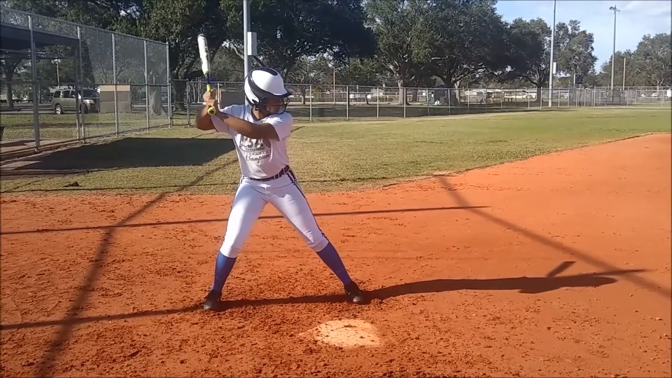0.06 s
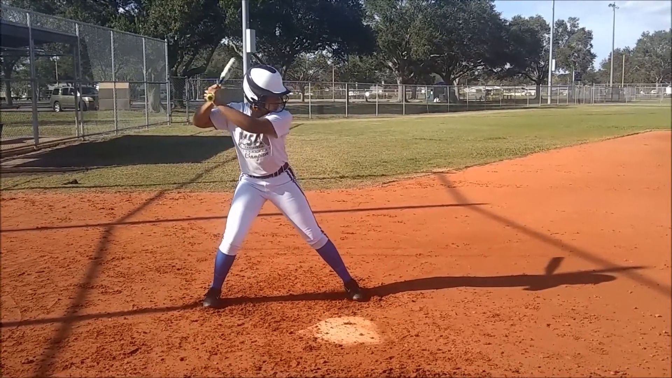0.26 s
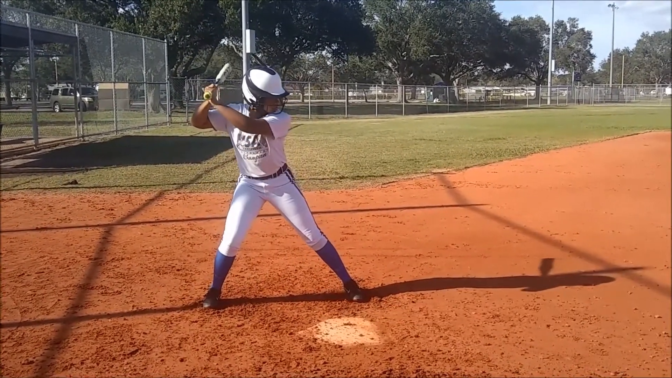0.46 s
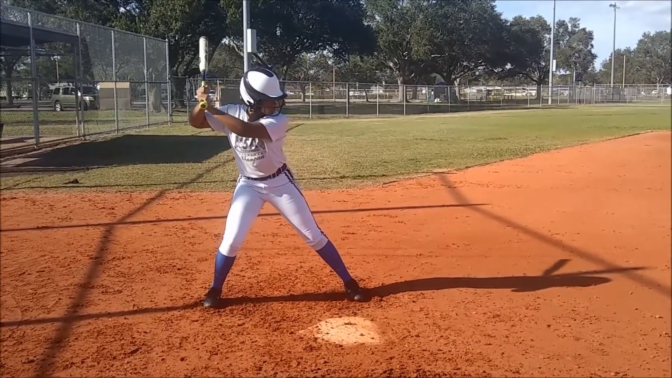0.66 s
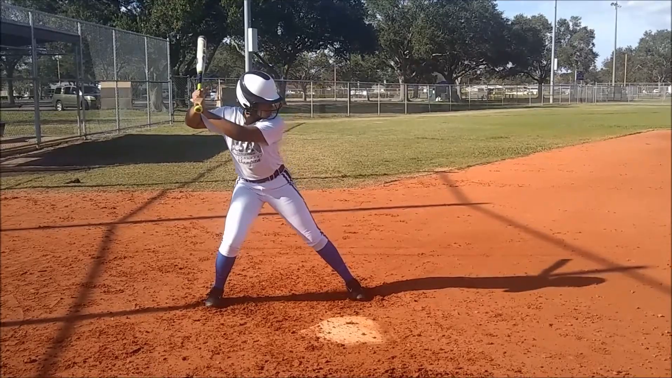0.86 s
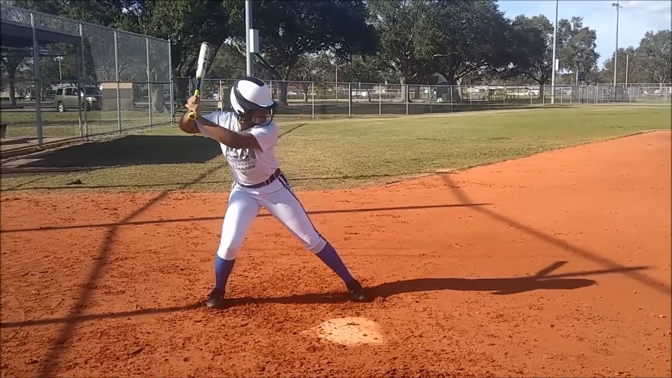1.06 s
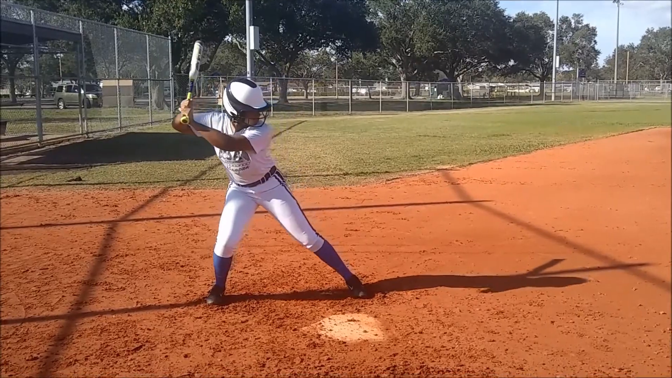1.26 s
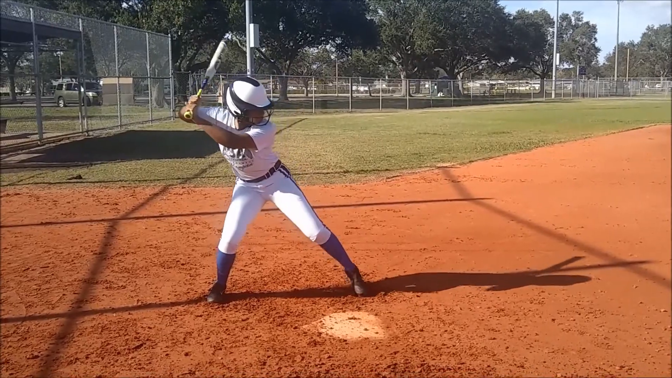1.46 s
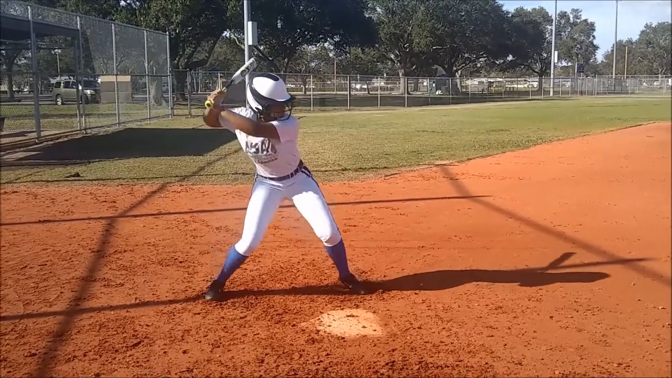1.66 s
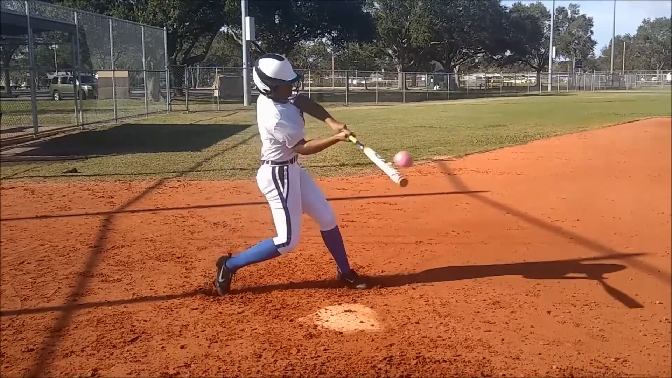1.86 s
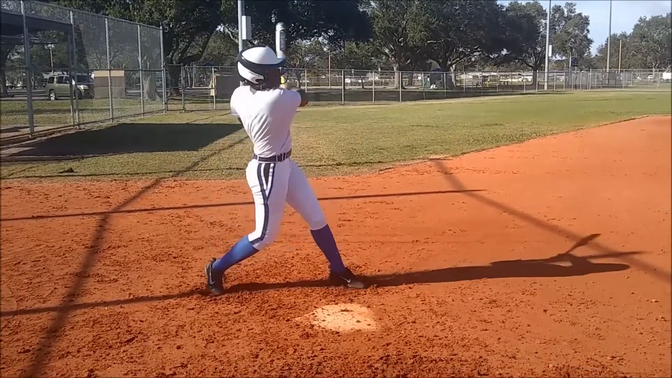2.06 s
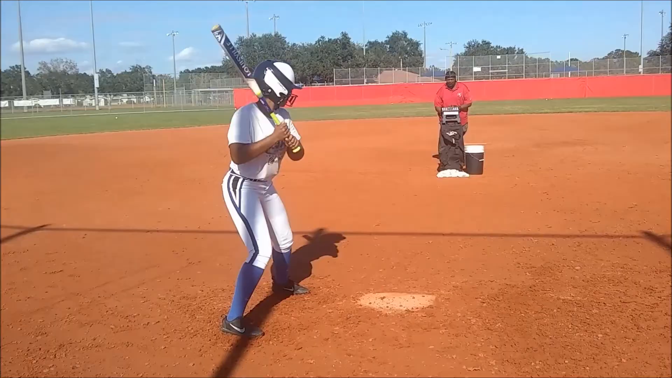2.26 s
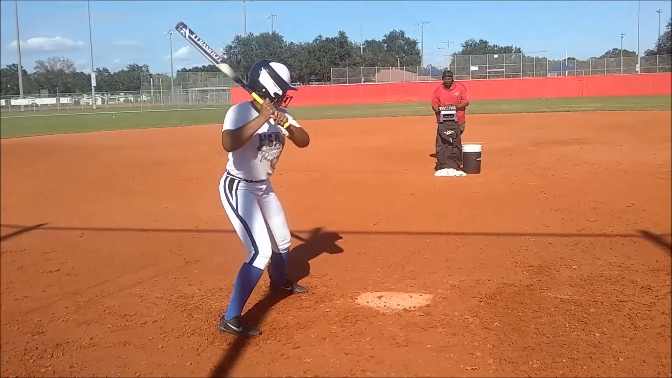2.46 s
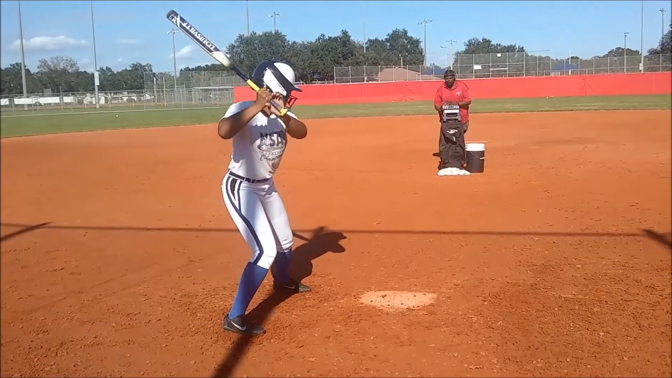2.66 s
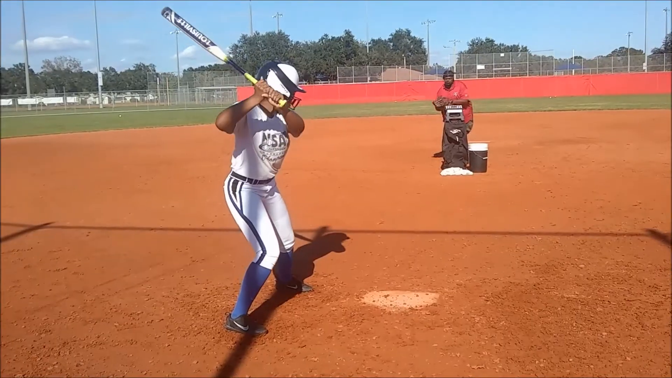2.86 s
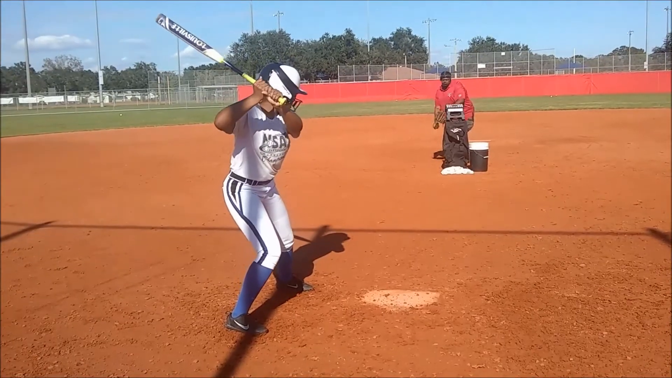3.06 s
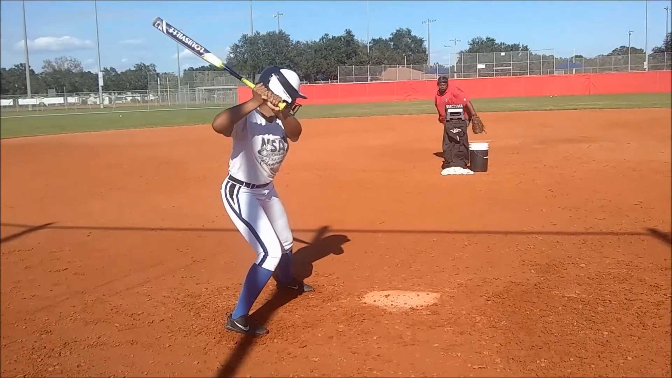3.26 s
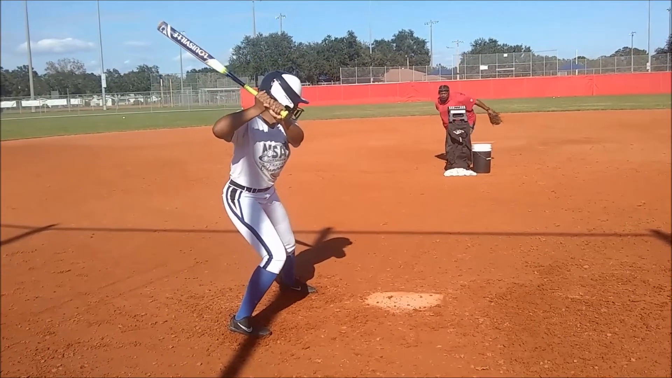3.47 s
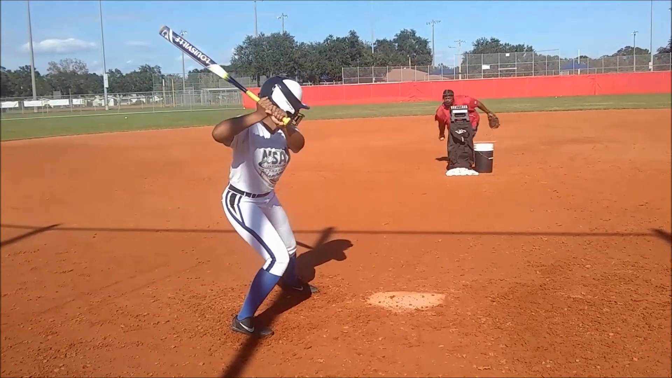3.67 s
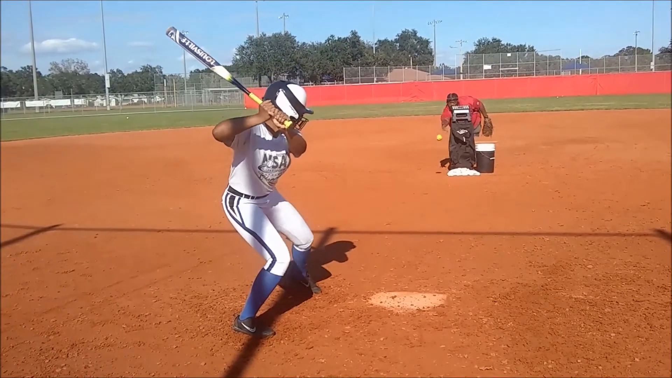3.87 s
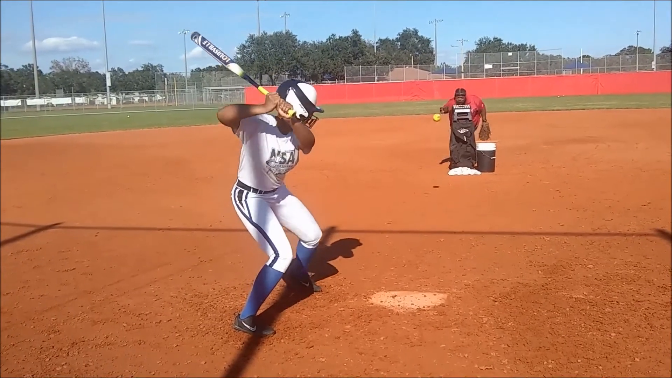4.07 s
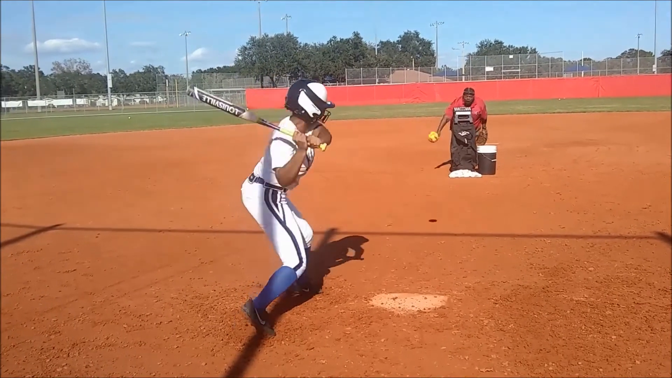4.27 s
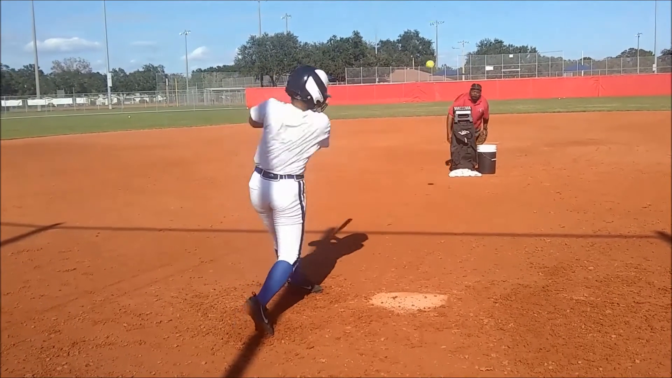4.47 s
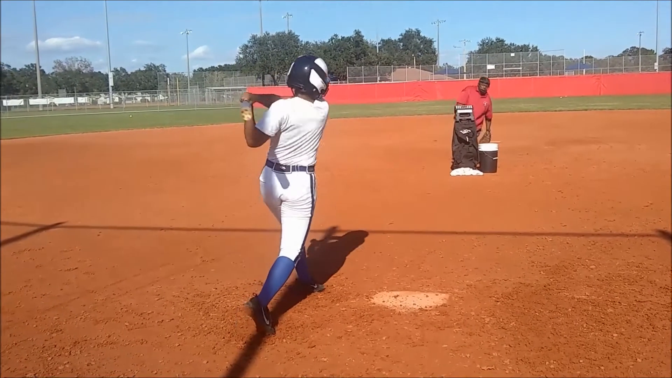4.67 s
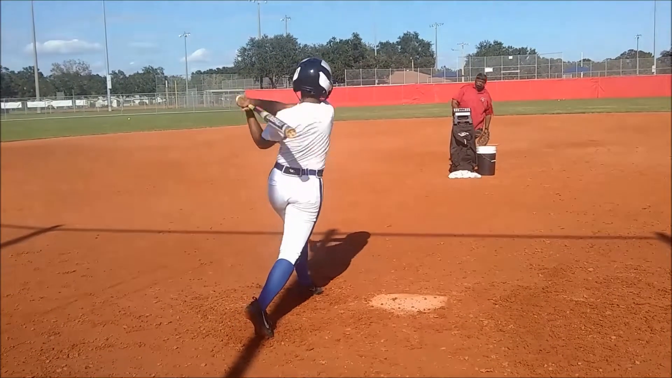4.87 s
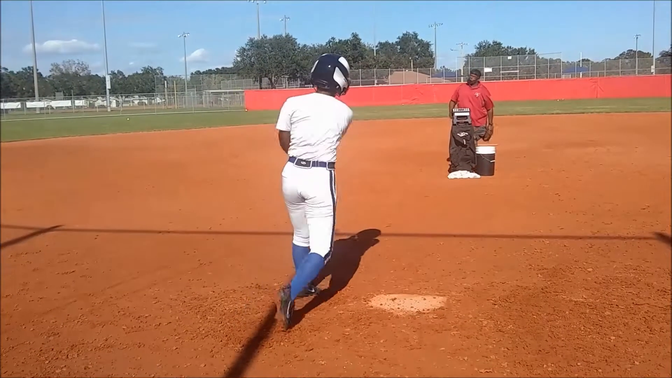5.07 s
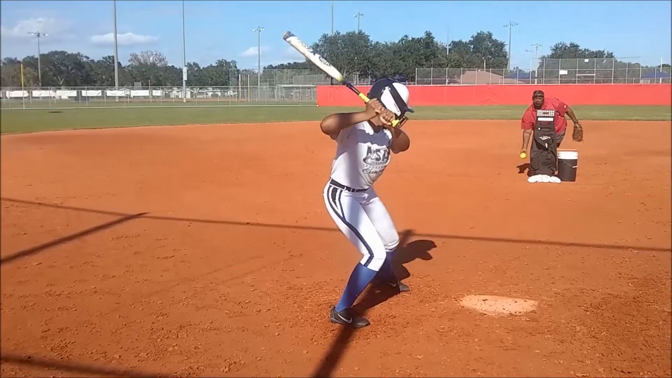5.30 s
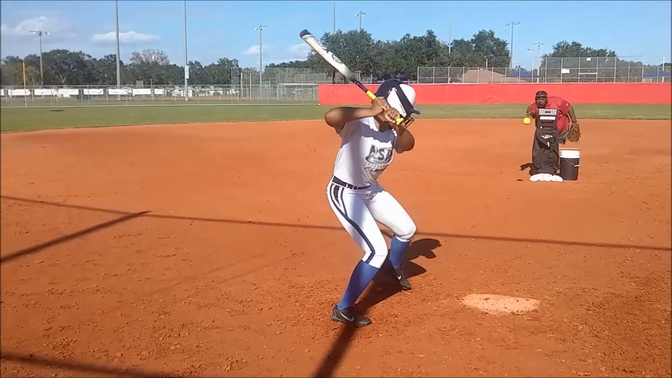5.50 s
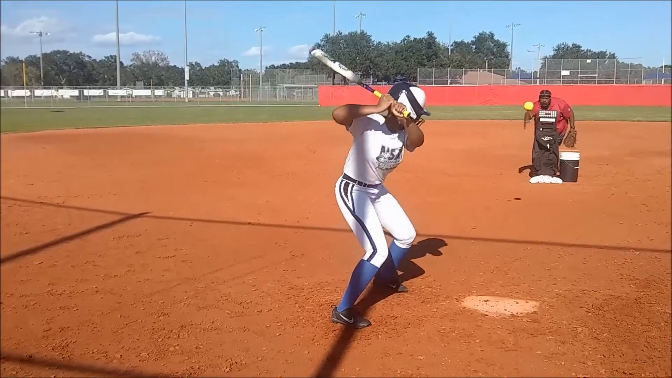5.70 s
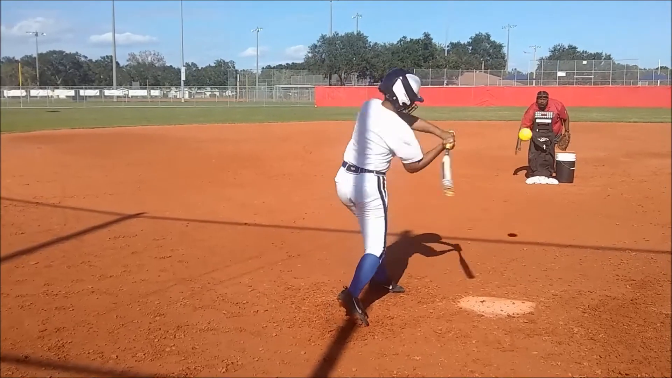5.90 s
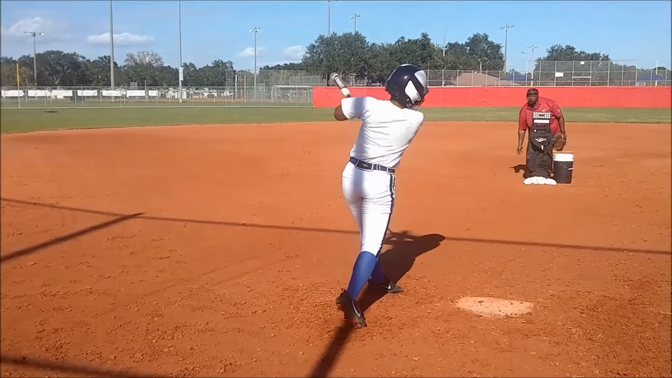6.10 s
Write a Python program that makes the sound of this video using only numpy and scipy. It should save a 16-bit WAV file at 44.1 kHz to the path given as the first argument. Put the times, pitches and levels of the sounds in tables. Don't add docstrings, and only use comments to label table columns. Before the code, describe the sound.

A hollow softball bat cracks three pitched balls with sharp metallic pings and short outdoor echoes, over faint traffic rumble, hiss and light wind.

```python
import sys
import numpy as np
from scipy import signal
from scipy.fft import rfft, irfft, next_fast_len
from scipy.io import wavfile
from scipy.ndimage import uniform_filter1d

SR = 44100
rng = np.random.default_rng(int(sys.argv[2]) if len(sys.argv) > 2 else 0)


def boost_factor(decibels):
    exponent = np.asarray(decibels, float) / 20
    return 10 ** exponent


def put_to_file(sound):
    columns = np.atleast_2d(sound).T
    safe = np.clip(columns, -1, 1)
    whole_steps = np.round(safe * 32767)
    wavfile.write(sys.argv[1], SR, whole_steps.astype(np.int16))


N = 270774
T = np.arange(N) / SR
T_BLOW = np.arange(SR // 4) / SR


def shape(x, points):
    hz, db = np.transpose(points)
    f = np.fft.rfftfreq(x.shape[-1], 1 / SR) + 1
    gain = boost_factor(np.interp(np.log(f), np.log(hz), db))
    return irfft(rfft(x) * gain, x.shape[-1])


def band(x, hz, width_hz):
    n = x.shape[-1]
    size = next_fast_len(n, real=True)
    bell = np.exp(-((np.fft.rfftfreq(size, 1 / SR) - hz) / width_hz) ** 2)
    y = irfft(rfft(x, size) * bell, size)[..., :n]
    return y / np.sqrt(np.mean(y ** 2))


def walk(rate_hz):
    k = int(SR / rate_hz)
    steps = np.repeat(rng.standard_normal(N // k + 1), k)
    return uniform_filter1d(uniform_filter1d(steps, k), k)[:N]


def bump(s, length_s):
    return np.exp(-((T - s) / length_s) ** 2)


def add(out, x, s):
    i = int(s * SR)
    out[:, i:i + x.shape[1]] += x[:, :max(N - i, 0)]


# (frequency [Hz], gain [dB])
CRACK_COLOUR = [(600, -29.5), (1500, 0), (3000, -3.5), (6000, -2), (9000, -7), (12000, -6.5), (15000, -21)]


def contact_crack():
    noise = shape(rng.standard_normal((3, len(T_BLOW))), CRACK_COLOUR)
    ports = noise[:1] + 1.3 * noise[1:]
    return ports / ports.std() * (np.exp(-T_BLOW / 0.002) + 0.38 * np.exp(-T_BLOW / .007))


def barrel_ring(modes):
    ring = 0
    for k, (hz, db, t60_s) in enumerate(modes):
        tone = np.sin(2 * np.pi * hz * T_BLOW) * 1000 ** (-T_BLOW / t60_s)
        ring = ring + (-1) ** k * boost_factor(db) * tone
    return ring


def swing_ring(returns):
    late = 0
    for start_s, length_s, hz, db in returns:
        opening = np.clip((T_BLOW - start_s) / .004, 0, 1)
        closing = np.clip((start_s + length_s - T_BLOW) / 0.02, 0, 1)
        flutter = boost_factor(db + 2.3 * walk(70)[:len(T_BLOW)])
        late = late + flutter * opening * closing * np.sin(2 * np.pi * hz * T_BLOW)
    return late


def scatter(x, decay_s, db):
    envelope = np.exp(-T_BLOW / decay_s) * (1 - np.exp(-T_BLOW / .0006))
    paths = rng.standard_normal((2, len(T_BLOW))) * envelope / np.sqrt(decay_s * SR)
    return boost_factor(db) * signal.fftconvolve(x[None], paths, axes=1)[:, :len(T_BLOW)]


# (time [s], peak [dB], crack [dB], right port lag [samples], contact rise [s])
BLOWS = [
    (1.9216, -1.5, -1, 3.0, .0002),
    (4.3975, 0, -3, 2.2, 0.00017),
    (5.9855, 0, 0.5, 3.3, 0.00053),
]
# (frequency [Hz], level [dB], t60 [s])
BARREL_MODES = [
    [(520, -0.5, 0.018), (670.3, -2, .022), (920, -8.5, .018), (1078, -6, 0.05), (1210, -4, .02),
     (2003, -15, .07), (3390, -16.5, 0.064), (4474, -8.5, .055), (5550, -18.5, 0.05), (7300, -14, .05),
     (10080, -12, .06)],
    [(300, -11, 0.0076), (816.7, -7, 0.024), (1027, -9, 0.035), (1180, -12, .035), (1321, -7.5, 0.15),
     (1590, -9, 0.027), (1948, -22.5, 0.2), (3410, -26, 0.11), (3810, -21, 0.083), (4570, -21.5, .06),
     (5300, -24, 0.049), (8050, -10, 0.025), (2850, -10, .02), (10300, -10, .02)],
    [(318, -1.5, 0.013), (774, -10.5, 0.026), (1085, -4, 0.038), (1295, -20.5, 0.082), (1777, -8, 0.025),
     (1944, -13, 0.084), (2780, -28, .03), (3416, 1, 0.052), (3814, -18, 0.083), (4440, -3.5, 0.063),
     (5506, 0.5, 0.035), (7100, -16, .03), (10270, -7.5, .025), (11550, -14, 0.022)],
]
# (delay [s], length [s], frequency [Hz], level [dB])
SWING_RINGS = [
    [(.028, .08, 1322, -38), (.025, .08, 1085, -47)],
    [(.075, .04, 1100, -48)],
    [(.039, .018, 1385, -35), (.053, .035, 1360, -43), (.06, .04, 1060, -52)],
]
# (t60 [s], ring [dB], crack [dB])
BACKSTOP = [(0.3, -25, -12), (0.38, -34, -15), (0.22, -38, -22)]
# (delay [s], level [dB], smear [s])
MESH_SLAPS = [
    [(.03, -21, .011), (.075, -39.5, 0.016)],
    [(0.038, -31.5, .014), (.075, -38, .015)],
    [(.022, -35, .01), (.036, -20.5, .008), (.078, -39, 0.015)],
]
# (delay [s], level [dB], smear [s])
FENCES = [
    [(.222, -38, 0.061), (.245, -38.5, 0.0044), (.337, -40, 0.013)],
    [(.197, -40.5, 0.049), (.3465, -31.5, 0.002), (.35, -43.5, 0.011)],
    [],
]
# (middle [s], spread [s], depth [dB])
DUCKS = [(.1, 0.037, -11.5), (.056, .02, -17.5), (0.081, .03, -8)]
# (frequency [Hz], gain [dB])
NEAR_COLOUR = [(300, -19.5), (1000, -4), (2200, -4.5), (3500, 4.5), (8000, -1.5), (10000, 1.5), (12500, -5),
               (14200, -30)]
# (frequency [Hz], gain [dB])
FAR_COLOUR = [(700, 1), (1300, 1.5), (2000, 2), (3000, 8.5), (6000, 3), (12000, -0.5), (14300, -14)]


def bat():
    out = np.zeros((2, N))
    per_blow = zip(BLOWS, BARREL_MODES, SWING_RINGS, BACKSTOP, MESH_SLAPS, FENCES, DUCKS)
    for hit, modes, returns, wall, slaps, fences, duck in per_blow:
        s, peak_db, crack_db, lag_samples, rise_s = hit
        t60_s, ring_db, grit_db = wall
        middle_s, spread_s, duck_db = duck

        contact = 1 - np.exp(-T_BLOW / rise_s)
        crack = boost_factor(crack_db) * contact_crack() * contact
        body = barrel_ring(modes) * contact
        late = swing_ring(returns)
        right = np.interp(T_BLOW - lag_samples / SR, T_BLOW, body, left=0)
        direct = np.array([body, right]) + crack

        crack = crack.mean(axis=0)
        near_crack = shape(crack, NEAR_COLOUR)
        near = boost_factor(ring_db) * body + boost_factor(grit_db) * near_crack
        back = scatter(near, t60_s / np.log(1000), 0)
        gain = boost_factor(duck_db / (1 + np.exp((middle_s - T_BLOW) / spread_s * 4)))
        add(out, (boost_factor(peak_db) * (direct + back) + late) * gain, s)

        for delay_s, db, smear_s in slaps:
            add(out, scatter(boost_factor(peak_db) * near_crack, smear_s, db), s + delay_s)
        front = boost_factor(peak_db) * shape((crack + .5 * body) * np.exp(-T_BLOW / .009), FAR_COLOUR)
        for delay_s, db, smear_s in fences:
            add(out, scatter(front, smear_s, db), s + delay_s)
    return out


# (time [s], length [s], centre [Hz], width [Hz], level [dB])
SCUFFS = [(0.594, 0.12, 9000, 5860, -69), (1.375, 0.055, 8700, 7150, -60), (1.722, 0.12, 3470, 896, -66.5),
          (1.894, 0.039, 3502, 3510, -54.5), (2.602, 0.043, 8000, 8050, -64),
          (3.232, 0.056, 4000, 4985, -66.5), (4.334, 0.11, 2520, 4003, -60),
          (4.93, 0.014, 3000, 1500, -68.5), (5.94, 0.073, 2994, 2910, -60)]


def scuffs():
    out = np.zeros((2, N))
    for s, length_s, hz, width_hz, db in SCUFFS:
        grit = band(rng.standard_normal((2, N)), hz, width_hz)
        out += boost_factor(db + 1.3 * walk(82)) * grit * bump(s, length_s)
    return out


# (time [s], length [s], frequency [Hz], level [dB])
KNOCKS = [(.39, .02, 55, -44), (1.41, .02, 50, -44), (2.63, .005, 210, -28), (3.2, .005, 240, -33),
          (4.92, .015, 60, -42), (5.455, .012, 70, -26), (5.462, .01, 150, -31), (5.835, .012, 60, -28)]


def case_knocks():
    out = np.zeros((2, N))
    for s, length_s, hz, db in KNOCKS:
        right_share = .8 if hz > 100 else .12
        cycles = hz * (T - s) * (1 - (T - s) / length_s / 4)
        thud = np.sin(2 * np.pi * cycles) * bump(s, length_s)
        out += boost_factor(db) * np.array([[1], [right_share]]) * thud
    return out


# (start [s], end [s], frequency [Hz], width [Hz])
HUMS = [(-.1, 1.93, 120, 16), (.63, 1.42, 470, 11), (1.75, 1.92, 412, 8), (2.7, 4.4, 240, 25),
        (2.75, 3.3, 100, 14), (4.45, 4.9, 250, 20), (5.09, 5.21, 790, 20), (5.52, 5.8, 107, 14)]
HUM_DB = [-46, -63, -62, -54, -47, -61, -66, -37]


def hums():
    out = np.zeros((2, N))
    for (start_s, end_s, hz, width_hz), db in zip(HUMS, HUM_DB):
        gate = np.clip(np.minimum(T - start_s, end_s - T) / 0.024, 0, 1)
        hum = gate * band(rng.standard_normal(N), hz, width_hz)
        level = np.sqrt(np.sum(gate ** 2) / np.sum(hum ** 2))
        out += boost_factor(db) * hum * level * np.array([[1], [.8]])
    return out


# (time [s], length [s], level [dB])
GUSTS = [(.4, 0.045, -60), (1.393, 0.052, -52), (2.61, 0.034, -43), (3.35, 0.088, -55),
         (3.63, 0.074, -41.5), (3.99, 0.086, -41), (4.132, 0.035, -41), (4.263, .035, -37.5),
         (4.935, 0.038, -47.5), (5.462, 0.029, -35), (5.645, 0.092, -39), (5.83, 0.046, -38),
         (5.967, 0.032, -30)]


def wind():
    power = boost_factor(background_db(column=3)) ** 2
    for s, length_s, db in GUSTS:
        power = power + boost_factor(db) ** 2 * bump(s, length_s)
    gust = shape(rng.standard_normal(N), [(15, -8), (50, 3), (110, -3), (250, -20), (700, -49.5)])
    buffet = np.sqrt(power) * boost_factor(3 + 3.5 * walk(30)) * gust / gust.std()
    return np.array([[1], [0]]) * buffet


# (frequency [Hz], gain [dB])
TRAFFIC_COLOUR = [(25, -12.5), (60, -6), (110, 2.5), (200, -6), (400, -17.5), (700, -26), (1200, -30),
                  (1800, -34.5), (2600, -43)]
# (frequency [Hz], share [0-1])
PORT_LIKENESS = [(60, 1), (130, 1), (300, 0.7), (700, 0.2), (1200, .5), (2000, 0.8)]


def traffic():
    rumble, swell = 0, walk(5)
    like_hz, like_share = np.transpose(PORT_LIKENESS)
    for hz in 30 * 2 ** np.arange(0, 6.6, .5):
        like = np.interp(np.log(hz), np.log(like_hz), like_share)
        both, left, right = band(rng.standard_normal((3, N)), hz, hz / 4)
        pair = np.sqrt(like) * both + np.sqrt(1 - like) * np.array([left, right])
        flicker_db = 1.5 * walk(8.6) + 1.5 * swell * (hz < 400)
        rumble = rumble + np.sqrt(hz) * pair * boost_factor(flicker_db)
    rumble = shape(rumble, TRAFFIC_COLOUR)
    return boost_factor(background_db(column=1) + 14.5) * rumble / rumble.std()


# (frequency [Hz], gain [dB])
HISS_COLOUR = [(1000, 3), (2500, 0.5), (5000, -2), (8000, -2.5), (11000, -5), (13000, -6), (14300, -5.5)]


def hiss():
    noise = shape(rng.standard_normal((2, N)), HISS_COLOUR) * boost_factor(.8 * walk(12))
    return boost_factor(background_db(column=2, share=0.29)) * noise / noise.std()


# (start [s], traffic [dB], hiss [dB], breeze [dB])
STRETCHES = [
    (0, -57.5, -61.5, -57),
    (2.289, -57, -61, -59),
    (5.22, -55.5, -59, -52.5),
]


def background_db(column, share=1):
    agc_db, fall_s, back_db_per_s = -9.5, .04, 4.5
    stretches = np.array(STRETCHES)
    index = np.searchsorted(stretches[:, 0], T, side="right") - 1
    since_s = np.maximum(T - np.array(BLOWS)[index, 0], 0)
    dip_db = agc_db * (1 - np.exp(-since_s / fall_s)) + back_db_per_s * since_s
    return uniform_filter1d(stretches[index, column] + share * dip_db, size=300)


# (start [s], end [s])
SILENCE = (5.194, 5.255)


def scene():
    fade_in_s = 0.23
    start_s, end_s = SILENCE
    closing = np.clip((start_s - T) * 1000, 0, 1)
    opening = 1 - np.exp(-np.maximum(T - end_s, 0) / fade_in_s)
    gate = np.where(T < end_s, closing, opening)
    low_pass = signal.ellip(10, .2, 70, 14300, fs=SR, output="sos")
    quiet = traffic() + hiss() + wind() + scuffs() + case_knocks() + hums()
    return (bat() + signal.sosfilt(low_pass, quiet)) * gate


def roll_off(x):
    return signal.sosfilt(signal.butter(12, 16010, fs=SR, output="sos"), x)


# (frequency [Hz], gain [dB])
CROSS_FEED = [(20, -1.5), (3600, -1.5), (4600, -5.5), (5800, -11), (7000, -14), (10000, -18)]


def record(dry):
    feed_delay_s = .000435
    turn = np.exp(-2j * np.pi * np.fft.rfftfreq(N, 1 / SR) * feed_delay_s)
    late = irfft(rfft(shape(dry[::-1], CROSS_FEED)) * turn, N)
    wide = np.clip((dry - late) / np.sqrt(2), -1, 1)
    mix = shape(wide, [(20, 0), (13000, 0), (14300, -4), (15500, -20), (16100, -45)])
    return roll_off(mix)


dry = scene()
out = record(dry)
put_to_file(out)
```